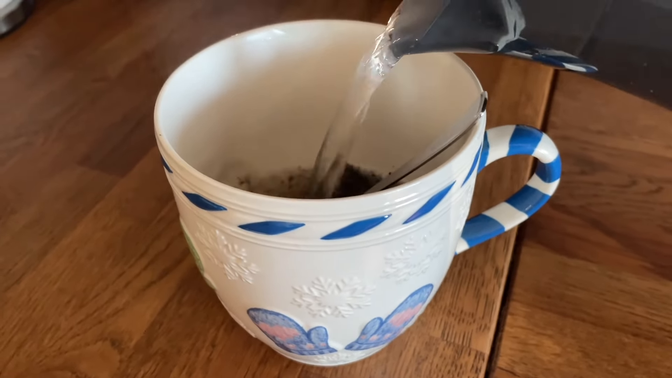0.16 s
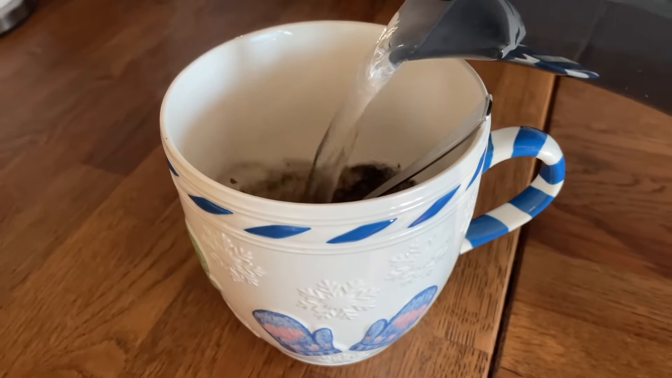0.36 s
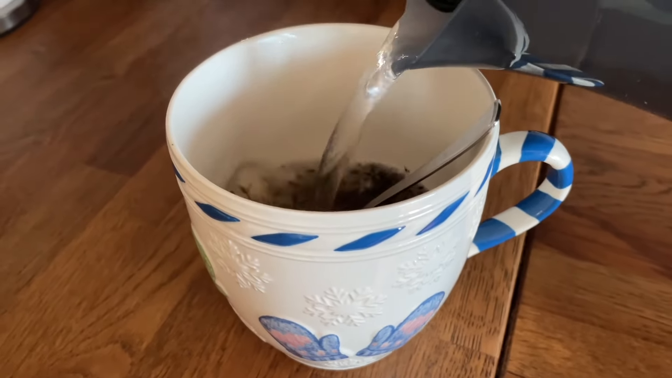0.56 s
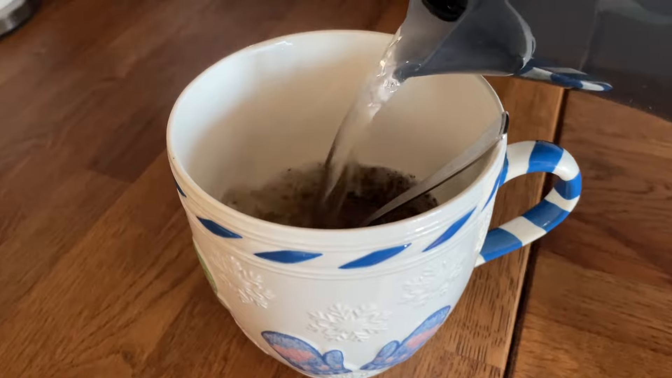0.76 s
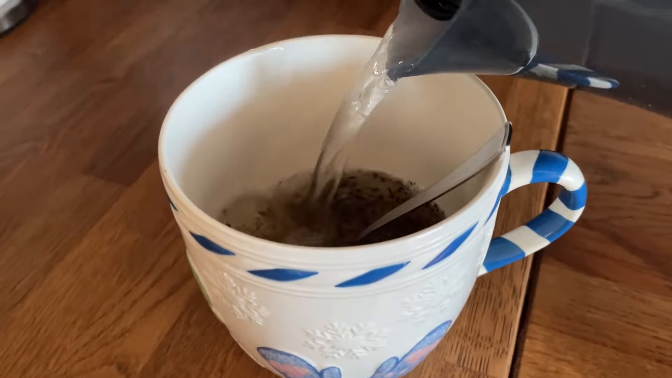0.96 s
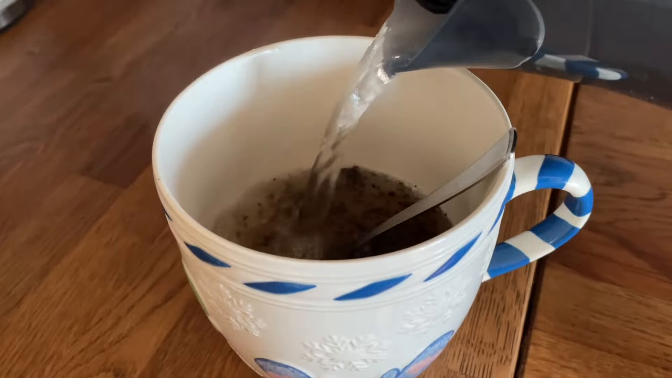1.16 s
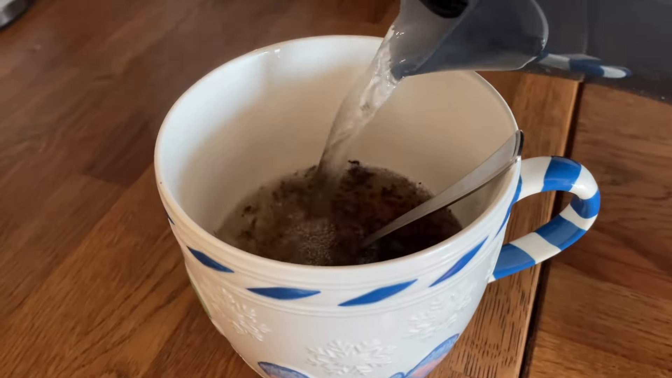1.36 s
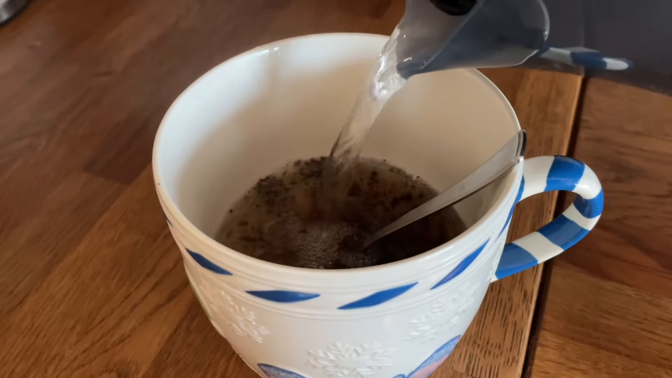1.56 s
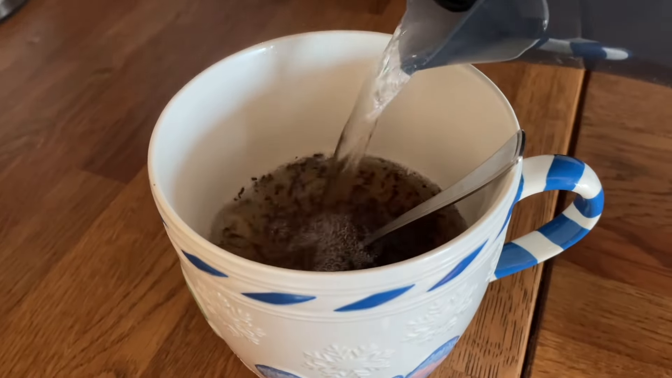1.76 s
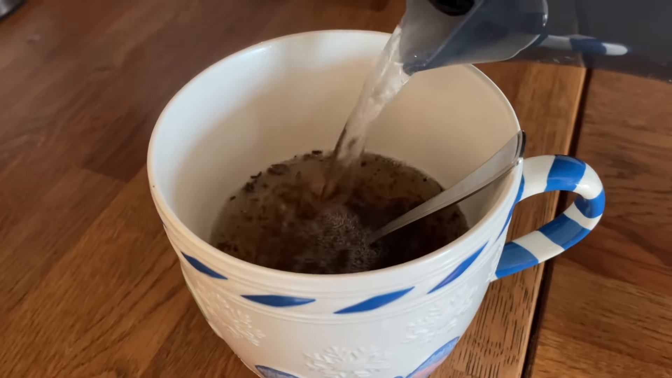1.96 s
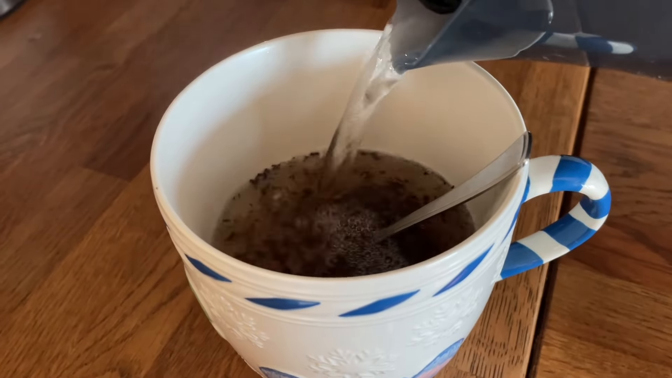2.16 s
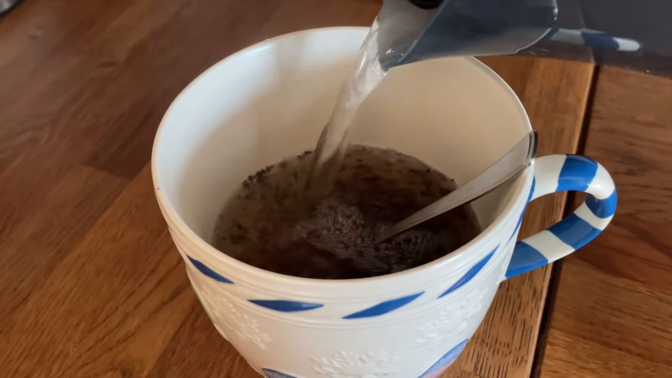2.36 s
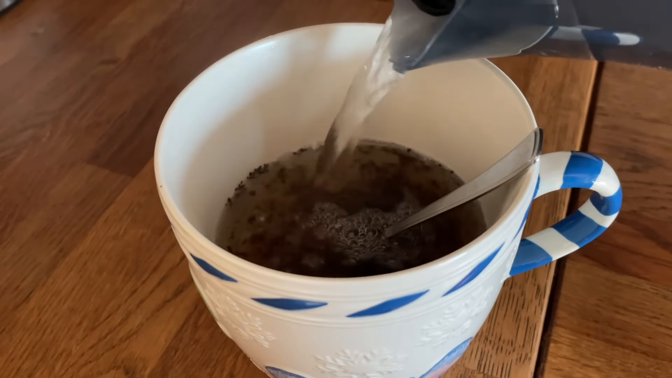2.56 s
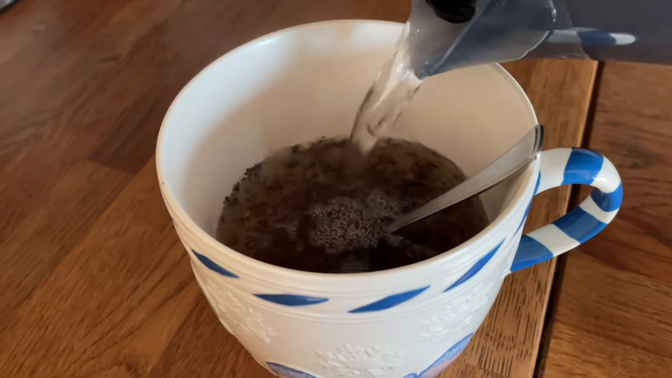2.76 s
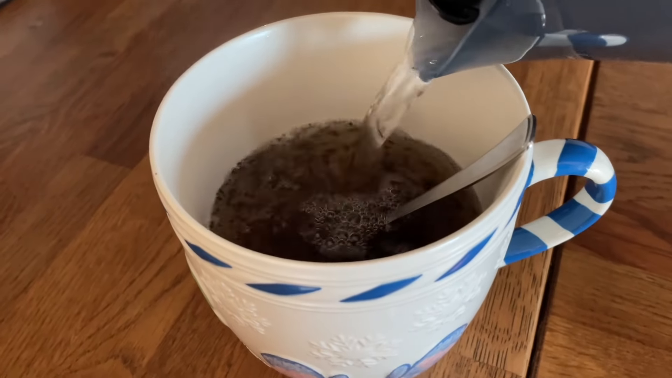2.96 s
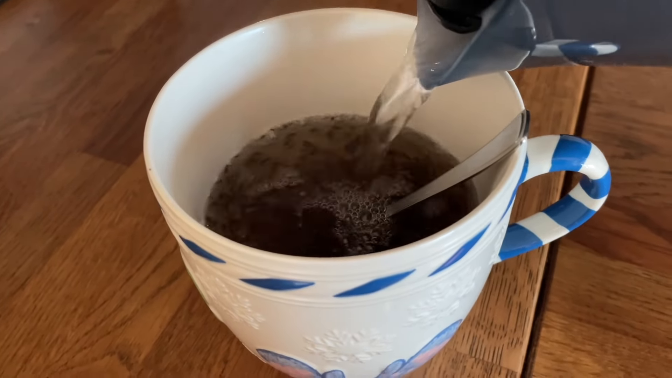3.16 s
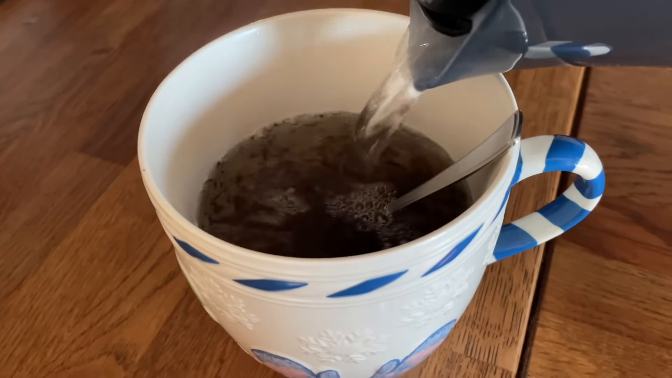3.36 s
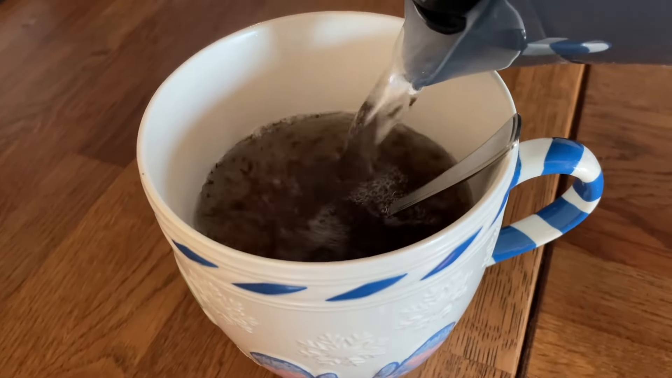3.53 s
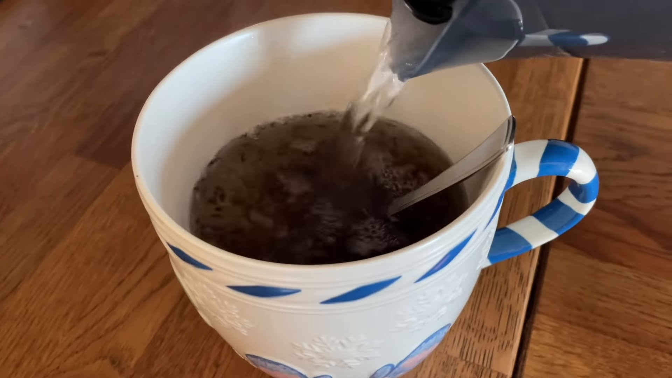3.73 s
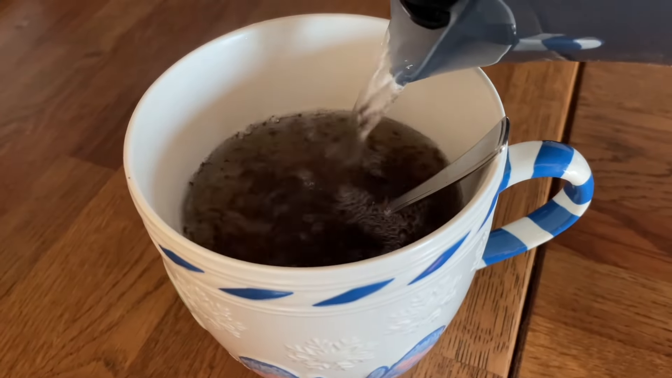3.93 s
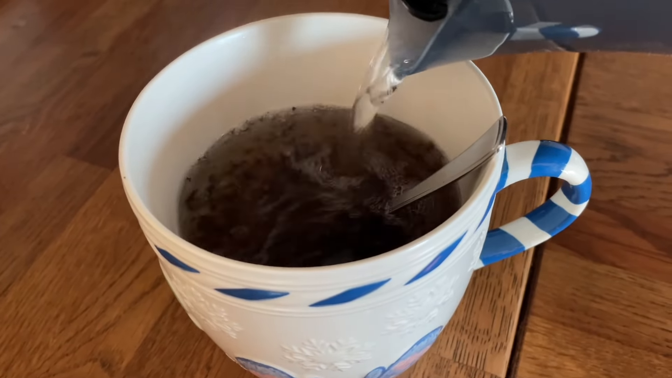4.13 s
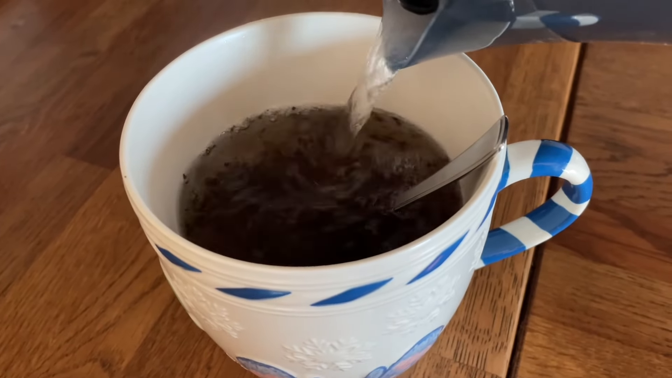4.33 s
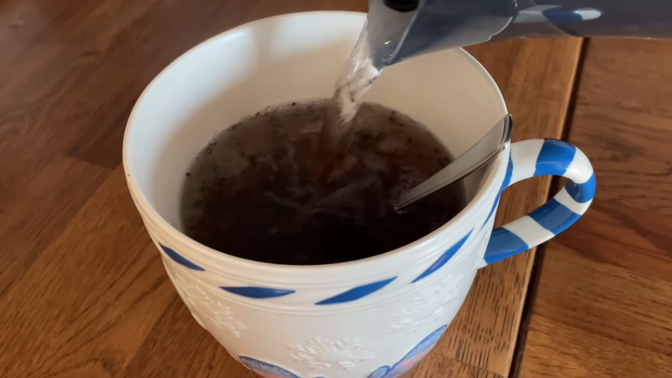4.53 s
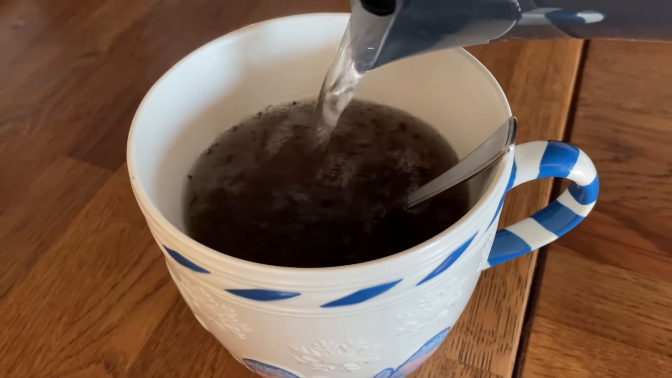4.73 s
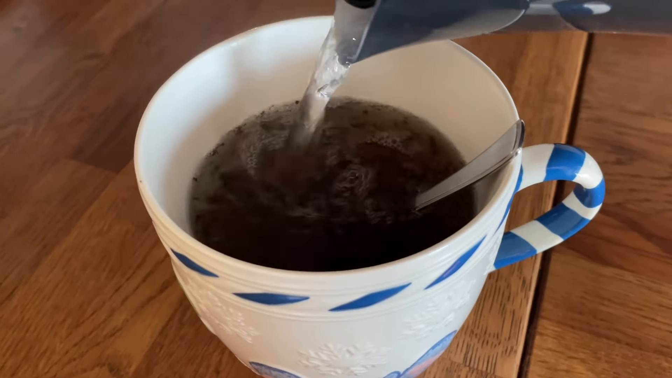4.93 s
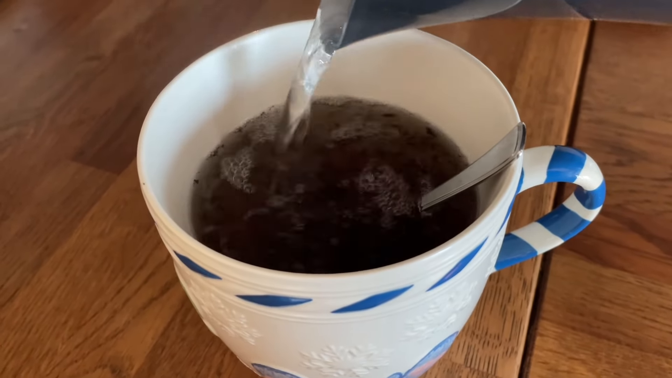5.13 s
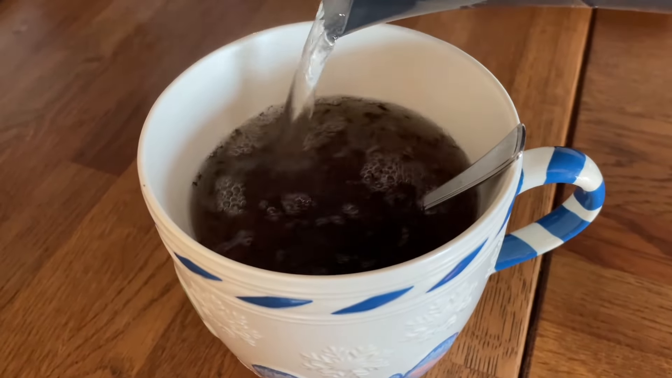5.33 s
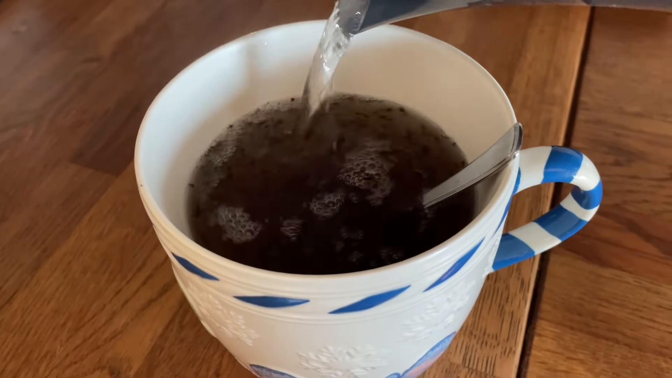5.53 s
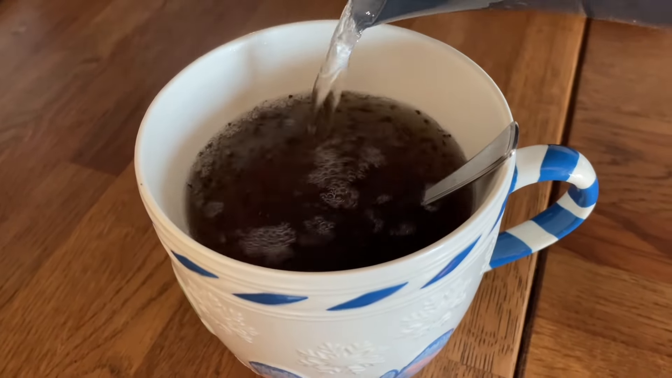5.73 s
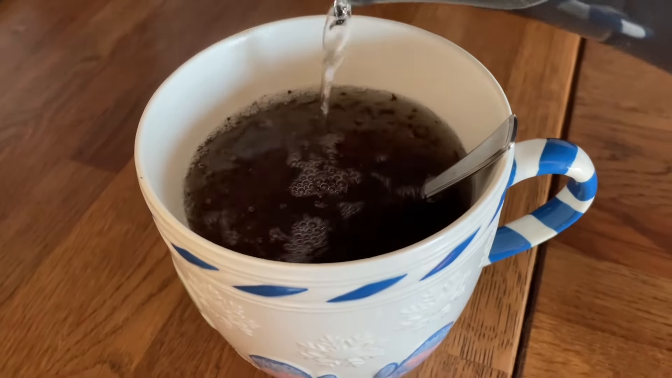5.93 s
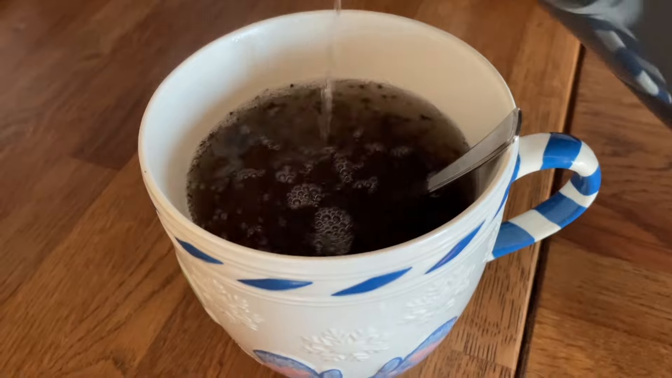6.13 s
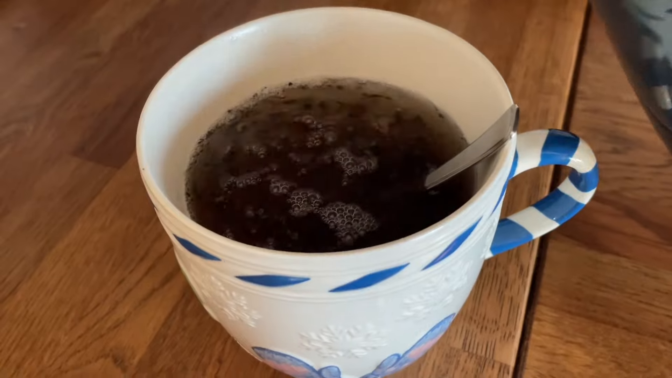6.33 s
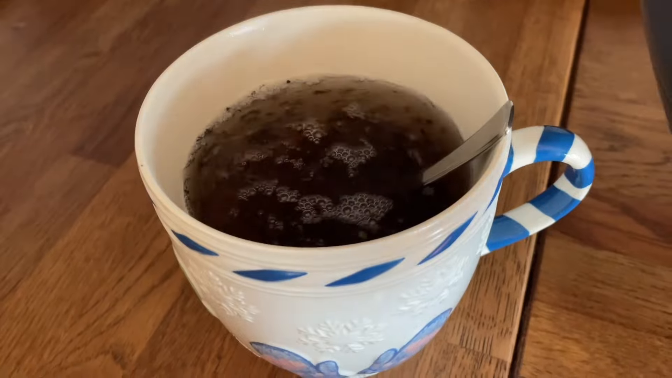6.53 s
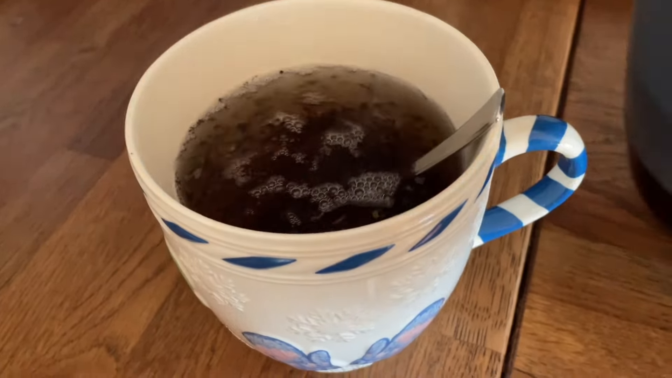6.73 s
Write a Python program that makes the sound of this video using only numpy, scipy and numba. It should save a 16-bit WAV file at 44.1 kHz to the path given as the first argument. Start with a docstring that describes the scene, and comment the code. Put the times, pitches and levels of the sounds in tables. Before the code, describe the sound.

Close-up pour of water filling a mug, ringing gurgles rising in pitch, stopping around six seconds with soft knocks, drips and a brief faint hiss.

```python
"""Hot water pours from a kettle into a ceramic mug on a wooden table, close to a phone with two microphone ports.
From the start, bubbles caught by the stream plop, tick and spit as decaying sines over a random patter.
Resonators for the air above the water ring with them, mostly higher and looser as the mug fills.
Near the end something knocks dully on wood (pushed decaying modes), the stream breaks into drops,
and a brief hiss (band noise) dies away. A quiet kitchen rumble and faint air (coloured noise) run throughout."""
import sys
import numpy as np
from scipy import signal
from scipy.fft import rfft, irfft, next_fast_len
from scipy.io import wavfile
from numba import njit

SR = 44100
rng = np.random.default_rng(int(sys.argv[2]) if len(sys.argv) > 2 else 0)


def master_out(mix):
    """Clip the mix to full scale and print it as 16-bit PCM to the path in sys.argv[1]."""
    frames = np.transpose(np.atleast_2d(mix))
    ceiling = np.clip(frames, -1, 1)
    pcm = np.round(ceiling * 32767).astype(np.int16)
    wavfile.write(sys.argv[1], SR, pcm)


N = 303840


def undb(db):
    """Amplitude ratio of a level in dB."""
    return 10 ** (np.asarray(db) / 20)


def level(x, db):
    """Scale x to an RMS level in dB."""
    return x * undb(db) / np.sqrt(np.mean(x ** 2))


def steady(value):
    """Constant control signal."""
    return np.full(N, float(value))


def over_time(table):
    """Interpolate each column over the scene."""
    t_s, *columns = np.transpose(table)
    return [np.interp(np.arange(N) / SR, t_s, column) for column in columns]


def over_pitch(table, size):
    """Interpolate a spectrum on log frequency for an FFT of this size."""
    hz, value = np.transpose(table)
    bins_hz = np.arange(size // 2 + 1) * SR / size
    return np.interp(np.log(bins_hz + 1), np.log(hz + 1), value)


def drift(rate_hz, count=1):
    """Random motion below rate_hz, RMS 1."""
    lowpass = signal.butter(2, rate_hz, fs=SR, output="sos")
    return level(signal.sosfilt(lowpass, rng.standard_normal((count, N))), 0)


@njit
def svf(x, hz, width_hz):
    """State-variable band-pass with moving centre and width, gain 1 at the centre."""
    y, band, low = np.empty(len(x)), 0., 0.
    for i in range(len(x)):
        g, damping = np.tan(np.pi * hz[i] / SR), width_hz[i] / hz[i]
        v = (band + g * (x[i] + 1e-18 - low)) / (1 + g * (g + damping))
        band, low, y[i] = 2 * v - band, low + 2 * g * v, damping * v
    return y


@njit
def grains(length, start, hz, cycles, size, glide):
    """Sines swell over half a cycle, decay by 1/e per `cycles` and slide up as the bubble nears the surface."""
    y = np.zeros(length)
    for k in range(len(start)):
        step, phase, gain = 2 * np.pi * hz[k] / SR, 0., size[k]
        fade = np.exp(-hz[k] / SR / cycles[k])
        rise_ratio = 1 + glide * hz[k] / SR / cycles[k]
        stop = min(length, start[k] + int(6 * cycles[k] * SR / hz[k]))
        for i in range(start[k], stop):
            y[i] += gain * np.sin(phase) * min(phase / np.pi, 1.)
            phase += step
            step = min(step * rise_ratio, 2.8)
            gain *= fade
    return y


def bubbles(t_s, hz, octaves, cycles, db, chance):
    """One bubble grain per time, with scattered pitch and decay and random polarity."""
    pitch_hz = np.clip(hz * 2 ** (octaves * chance[:, 0]), 200, .42 * SR)
    decay_cycles = cycles * np.exp(0.13 * chance[:, 1])
    size = undb(db) * np.sign(chance[:, 2])
    return grains(N, (t_s * SR).astype(np.int64), pitch_hz, decay_cycles, size, 0.089)


# clearest pops: t/s, plop level/dB, tick level/dB, spit level/dB; before part gain
CLEAR_POPS = [(0.033, -35.5, -39, -41), (0.053, -42, -69, -55), (0.085, -44, -65, -83),
              (0.153, -33, -39, -52), (0.179, -28.5, -38.5, -78), (0.261, -37, -42.5, -81),
              (0.287, -43, -57, -80), (0.358, -30.5, -77, -76), (0.402, -33.5, -44, -63),
              (0.419, -33, -55, -69), (0.477, -27.5, -43.5, -62), (0.486, -30, -43, -51.5),
              (0.55, -31, -40.5, -52), (0.572, -30.5, -42.5, -56), (0.598, -29, -36, -46),
              (0.607, -28.5, -63, -48), (0.655, -28.5, -64, -73), (0.724, -36.5, -69, -79),
              (0.76, -31, -43, -50), (0.786, -36, -68, -79), (0.806, -30.5, -75.5, -75),
              (0.857, -30, -31.5, -50.5), (0.888, -36, -55, -77), (0.907, -47, -48, -73),
              (0.927, -36.5, -46, -64), (0.972, -31, -64, -83), (0.997, -33.5, -49, -59),
              (1.014, -34, -58, -80), (1.073, -33.5, -69, -84), (1.103, -42, -45, -61),
              (1.248, -36, -56, -74), (1.276, -34, -45, -59), (1.297, -36.5, -42.5, -59),
              (1.35, -32.5, -72, -80), (1.388, -39.5, -69, -81), (1.427, -26, -40, -61),
              (1.46, -30.5, -40, -78), (1.477, -33.5, -42, -58), (1.629, -36.5, -63, -56.5),
              (1.926, -39, -44.5, -56), (1.97, -34, -35, -47), (1.9715, -22.5, -29, -38),
              (2.062, -40.5, -44, -66), (2.093, -54, -42, -50), (2.117, -34.5, -42, -80),
              (2.131, -65, -41.5, -78), (2.162, -54, -51, -70), (2.179, -36.5, -50, -74),
              (2.218, -44, -44, -64), (2.246, -34.5, -43, -80), (2.278, -41, -41, -77),
              (2.427, -44.5, -61, -77), (2.564, -38, -41.5, -63.5), (2.605, -26.5, -38, -49.5),
              (2.769, -36.5, -42, -74), (2.802, -38, -37, -60), (2.834, -37, -37.5, -49),
              (2.897, -55, -57, -48), (2.904, -32.5, -25, -36.5), (2.933, -32, -42, -45),
              (2.971, -40, -42, -53), (3.01, -28, -33, -52), (3.07, -27, -47, -58),
              (3.124, -36.5, -47, -49.5), (3.15, -32.5, -37, -49), (3.288, -41, -53, -57.5),
              (3.333, -37, -69, -78), (3.533, -28, -38.5, -56), (3.557, -52, -44, -58),
              (3.58, -40, -35, -41.5), (3.645, -62, -51, -74), (3.657, -57, -43, -68),
              (3.665, -35.5, -40.5, -64), (3.697, -42, -53, -63), (3.711, -36.5, -49, -59),
              (3.775, -40, -43, -48.5), (3.852, -45, -48, -49), (3.914, -40.5, -64, -60),
              (3.934, -43, -53, -71), (3.969, -37.5, -46, -57), (3.997, -57, -45, -53),
              (4.012, -60, -45.5, -74), (4.036, -50, -60, -72), (4.052, -42, -44, -60),
              (4.086, -53, -40, -71), (4.114, -49, -54, -71), (4.15, -57, -39, -62), (4.183, -45, -60, -63),
              (4.192, -41, -61, -76), (4.208, -41, -51, -71), (4.257, -44, -56, -72),
              (4.286, -44, -64, -61), (4.314, -55, -59, -57.5), (4.345, -38.5, -57, -59),
              (4.402, -63, -49, -69), (4.415, -47, -55, -79), (4.437, -34.5, -60, -77),
              (4.454, -37, -64, -84), (4.482, -35, -61, -76), (4.503, -40, -63, -64),
              (4.524, -44, -56, -64), (4.554, -54, -44.5, -52), (4.574, -45, -61, -70),
              (4.601, -42, -57, -49.5), (4.636, -34.5, -63, -65), (4.647, -33.5, -52, -62),
              (4.69, -35, -43, -57), (4.756, -34, -58, -60), (4.798, -36.5, -44, -56),
              (4.81, -31, -52, -76), (4.877, -43, -45, -49), (4.932, -37, -49, -58),
              (5.031, -46, -47.5, -57), (5.065, -37.5, -42, -60), (5.143, -47, -51, -61),
              (5.179, -58, -42.5, -70), (5.223, -41, -47, -57), (5.314, -59, -55, -66),
              (5.408, -45, -45, -74), (5.419, -27, -41, -46), (5.455, -38, -53, -76),
              (5.467, -39, -48, -64), (5.532, -42, -63, -76), (5.566, -52, -52, -74),
              (5.577, -52, -46, -60), (5.664, -40, -51, -68), (5.678, -39.5, -62, -84),
              (5.741, -65, -45, -68), (5.75, -53, -40.5, -64), (5.767, -37, -56, -66),
              (5.788, -36, -50, -80), (5.832, -25, -40, -68), (5.978, -44, -50, -59),
              (6.004, -60, -51, -62), (6.022, -62, -40, -49), (6.033, -58, -45.5, -57),
              (6.053, -48, -39, -47.5), (6.072, -28, -36, -44), (6.084, -23, -33.5, -55),
              (6.105, -48, -35, -43.5), (6.115, -47, -43, -62), (6.144, -27.5, -33, -48),
              (6.162, -25, -36.5, -56), (6.178, -44, -51, -61), (6.188, -33, -48, -56),
              (6.199, -33.5, -45, -69.5)]
# plop, tick, spit: f/Hz, decay/cycles, pitch scatter/octaves, gain/dB
POP_PARTS = [(920, 0.57, 0.29, 2.5), (3385, 0.74, 0.39, 9), (10000, 1.19, 0.52, 22)]
# each sounding of a part: nominal delay/s, gain/dB
POP_REPEATS = ((.0002, -2), (.0007, -12.5), (.0018, -7), (.0045, -14))


def pops(rows):
    """A bubble pinches off and its neck snaps within milliseconds: each part sounds four times; plops climb."""
    t_s, *parts_db = np.transpose(rows)
    out = 0
    for db, (hz, cycles, octaves, part_db), climb in zip(parts_db, POP_PARTS, (rise(t_s), 1, 1)):
        for late_s, drop_db in POP_REPEATS:
            chance = np.clip(rng.standard_normal((400, 4))[:len(t_s)], -1.5, 1.5)
            start_s = t_s + late_s * np.exp(.3 * chance[:, 3])
            out = out + bubbles(start_s, hz * climb, octaves, cycles, db + part_db + drop_db, chance)
    return out


FAINT_PER_S, POUR_ENDS_S = 24, 6.2
FAINT_DB, FAINT_SCATTER_DB = (-54, -58.5, -73.5), (7.5, 3, 8)  # plop, tick, spit


def faint_pops():
    """Random rows like CLEAR_POPS, at uneven gaps while the stream runs."""
    gap, size = rng.gamma(2, .5, 400), rng.standard_normal((400, 3))
    t_s = np.cumsum(gap) / FAINT_PER_S
    parts_db = FAINT_DB + np.clip(size, -3, 1.5) * FAINT_SCATTER_DB
    return np.column_stack([t_s, parts_db])[t_s < POUR_ENDS_S]


# patter flow: t/s, large bubbles level/dB, small bubbles level/dB, spray level/dB
PATTER_FLOW = [(0.0, -60, -60.5, -70.5), (0.9, -60.5, -69.5, -70.5), (1.4, -72.5, -64, -71.5),
               (1.7, -73, -69, -70), (2.7, -72.5, -65.5, -75), (3.5, -70.5, -65, -73.5),
               (3.95, -78, -69, -70.5), (4.3, -70.5, -67, -76.5), (4.46, -63, -65.5, -74),
               (4.6, -71, -68.5, -75), (4.9, -73, -76, -74), (5.7, -73, -67.5, -79), (6.0, -67, -77.5, -64),
               (6.25, -90, -88, -86), (6.88, -95, -95, -90)]
# bubble families: rate/(1/s), f/Hz, pitch scatter/octaves, decay/cycles, size scatter/dB, level/dB before flow
LARGE_BUBBLES = (420, 828, 0.36, 2, 8, -4)
SMALL_BUBBLES = (600, 3197.5, 0.64, 1.5, 1, -1.5)
SPRAY_BUBBLES = (2700, 8600, 0.084, 0.3, 5.3, 0.85)
# stream drumming on the mug bottom, same columns; negative size scatter: most loud, a few fainter
BOTTOM_DRUMMING = (150, 222, -0.54, 1, -7.5, -2)
LARGEST_DB = 5.5  # size cap above the family's base size


def patter(family, flow_db, surge, climbs=False):
    """Bubbles at random times with exponential size scatter in dB, swelling with the stream's surges."""
    rate_per_s, hz, octaves, cycles, scatter_db, db = family
    chance = rng.random((16000, 2))
    t_s = np.cumsum(-np.log(1 - chance[:, 0])) / rate_per_s
    heard = t_s < PATTER_FLOW[-1][0]
    size_db = np.minimum(-scatter_db * np.log(1 - chance[heard, 1]), LARGEST_DB)
    pitch_hz = hz * rise(t_s[heard]) if climbs else hz
    sound = bubbles(t_s[heard], pitch_hz, octaves, cycles, size_db, rng.standard_normal((16000, 3))[heard])
    return level(sound * surge, db) * undb(flow_db)


def surges(rate_hz, spread_db):
    """The stream wobbles: sudden random swells sink back exponentially."""
    kicks = (rng.random(N) < rate_hz / SR) * rng.exponential(size=N)
    swell = signal.lfilter([1], [1, -np.exp(-1.5 * rate_hz / SR)], kicks)
    return undb(spread_db * np.minimum(swell, 2.5))


# stream runs smooth, few bubbles form: t/s, half length/s, level/dB
SMOOTH_LULLS = [(1.17, 0.044, -1), (2.54, 0.044, -9.5), (3.432, 0.096, -4), (3.737, 0.032, -7),
                (3.87, 0.057, -5), (5.65, 0.015, -11)]


def lulls():
    """Gain of the random bubbling, dipping in each lull."""
    t = np.arange(N) / SR
    return undb(sum(db * np.exp(-((t - t_s) / half_s) ** 4) for t_s, half_s, db in SMOOTH_LULLS))


# air above the water: t/s, depth mode f/Hz, cross mode f/Hz, widening/ratio, depth ring level/dB,
# cross ring level/dB, middle mode f/Hz, middle ring level/dB
AIR_COLUMN = [(0, 896, 2300, 0.69, 10.5, -15.5, 1480, 6), (1.1, 940, 2273, 0.85, 11, 5, 1563, 4.5),
              (1.6, 943, 2286, 1.17, 15, 0, 1510, 2), (2.3, 1036, 2360, 1.4, 13, -2, 1540, -1),
              (2.9, 1055, 2420, 3.8, 7.5, -7, 1540, -2.5), (3.7, 1150, 2450, 4.24, 6.5, -9.5, 1590, -2),
              (4.5, 1190, 2550, 4.4, -2.5, -6, 1600, -7.5), (5.4, 1290, 2480, 4, -5, -5.5, 1640, -8),
              (6.2, 1160, 2670, 2.1, -3.5, -6.5, 1660, 0)]
# f/depth mode, width/Hz at widening 1, gain/dB, loss/dB per unit widening above 1
DEPTH_RESONANCES = [(1.0, 87, -2.5, -0.5), (.76, 850, -11, 10.5)]
# f/cross mode, width/Hz at widening 1, gain/dB
CROSS_RESONANCES = [(0.998, 86, 12), (1.35, 282, 0.5)]
# four resonances of the mug wall, then a thin high band near 15 kHz: f/Hz, width/Hz, gain/dB
FIXED_RESONANCES = [(3700, 20, 0.5), (4550, 140, -3), (6160, 110, 4), (6970, 2600, -1), (15100, 370, 12.5)]
# rim echo cancels: f/cross mode, width/Hz, share removed per unit widening
RIM_DIPS = [(.8, 200, .1), (1.38, 350, .18)]
MIDDLE_WIDTH_HZ = 68  # at widening 1
SLOSH_HZ, SLOSH_SHARE = 6.4, 0.017  # rocking surface detunes the modes
# low ring of the nearly empty mug
EARLY_HZ, EARLY_WIDTH_HZ, EARLY_START_DB, EARLY_LOSS_DB_PER_S = 772, 60, 9, 5


def mug(water):
    """Direct sound plus band-pass resonances: moving air modes along and across the mug, and fixed ones."""
    depth_hz, cross_hz, wide, depth_db, cross_db, middle_hz, middle_db = over_time(AIR_COLUMN)
    rocking = drift(SLOSH_HZ, count=2)
    depth_hz = depth_hz * (1 + SLOSH_SHARE * rocking[0])
    cross_hz = cross_hz * (1 + SLOSH_SHARE * rocking[1] / 2)
    middle_hz = middle_hz * (1 + SLOSH_SHARE * rocking[1])

    depth = 0
    for ratio, width_hz, db, lost_db in DEPTH_RESONANCES:
        gain = undb(db - lost_db * (wide - 1) + depth_db)
        depth = depth + gain * svf(water, ratio * depth_hz, width_hz * wide)
    cross = 0
    for ratio, width_hz, db in CROSS_RESONANCES:
        cross = cross + undb(db + cross_db) * svf(water, ratio * cross_hz, width_hz * wide)
    fixed = sum(undb(db) * svf(water, steady(hz), steady(width_hz)) for hz, width_hz, db in FIXED_RESONANCES)
    middle = undb(middle_db) * svf(water, middle_hz, MIDDLE_WIDTH_HZ * wide)
    early_db = EARLY_START_DB - EARLY_LOSS_DB_PER_S * np.arange(N) / SR
    early = undb(early_db) * svf(water, steady(EARLY_HZ), steady(EARLY_WIDTH_HZ))

    # small bubbles radiate little below the depth mode
    direct = water - svf(water, 0.087 * depth_hz, 0.14 * depth_hz)
    direct = direct - svf(direct, 0.64 * depth_hz, 0.57 * depth_hz)
    out = undb(-5.0) * direct + depth + cross + middle + early + fixed
    for ratio, width_hz, share in RIM_DIPS:
        out = out - np.clip(share * wide, 0, .9) * svf(out, ratio * cross_hz, steady(width_hz))
    return out


def rise(t_s):
    """Depth mode frequency at these times relative to its start."""
    table_s, depth_hz = np.transpose(AIR_COLUMN)[:2]
    return np.interp(t_s, table_s, depth_hz) / depth_hz[0]


# lone clear-pitched bubbles: t/s, f/Hz, decay/cycles, level/dB
LONE_BUBBLES = [(5.488, 805, 30, -58), (6.254, 2700, 9, -68), (6.265, 3250, 11, -68),
                (6.276, 3830, 11, -61.5), (6.334, 6650, 11, -59.5)]


def blips():
    """Single bubbles ring on near the surface as long sine grains with little glide."""
    t_s, hz, cycles, db = np.transpose(LONE_BUBBLES)
    return grains(N, (t_s * SR).astype(np.int64), hz, cycles, undb(db), 0.015)


# f/Hz, left minus right level/dB
PORT_BALANCE = [(60, -11.5), (200, -9), (380, 16), (700, 5), (1290, 4.5), (2380, 7), (4400, 7),
                (8120, -1.5), (15000, 0)]
# f/Hz, left lead/rad
PORT_PHASE = [(0, 0), (690, .6), (1460, .45), (2500, 1.45), (4130, .9), (5250, .3), (6460, -1.0),
              (8200, -3.1), (9400, -4.2), (10600, -5.7), (12000, -6.3), (13500, -7.6), (15200, -9.4),
              (16700, -10.3)]
WANDER_HZ, WANDER_DB = 24.8, 2.5  # left minus right


def ports(x):
    """Two ports hear the mug at different level and phase; the foot of the stream wanders between them."""
    size = next_fast_len(N + 2048)
    sway = undb(WANDER_DB * drift(WANDER_HZ) * np.array([[.5], [-.5]]))
    half = undb(over_pitch(PORT_BALANCE, size) / 2) * np.exp(.5j * over_pitch(PORT_PHASE, size))
    return irfft(rfft(x, size) * np.array([half, 1 / half]), size)[:, :N] * sway


# dull knocks: t/s, level/dB, contact/ms, left minus right level/dB
WOOD_KNOCKS = [(5.834, -40, 0.42, -8), (5.839, -28.5, 1.57, -1), (5.848, -35.5, 0.42, 2),
               (6.086, -37, 0.2, 4), (6.092, -26.5, 0.88, 0.5), (6.107, -38, 1.4, -1),
               (6.443, -52.5, 0.49, -4)]
# f/Hz, gain/dB, t60/s; f and gain scatter per knock
WOOD_RESONANCES = [(111, -12, 0.07), (210, -11, 0.01), (328, 2.5, 0.056), (480, -4.5, 0.016),
                   (890, 0, 0.018), (1172, -8, 0.052), (1580, -9, 0.046), (2240, -10.5, 0.037)]
CRACK_DB, CRACK_HZ, CRACK_T60_S = -7, 1500, 0.071  # broad noise of a knock


def knocks():
    """Half-sine pushes into the modes of the wood; a softer contact pushes longer and sounds duller."""
    t = np.arange(SR // 4) / SR
    out = np.zeros((2, N + len(t)))
    for t_s, db, contact_ms, pan_db in WOOD_KNOCKS:
        chance = rng.standard_normal((len(WOOD_RESONANCES), 2))
        ring = 0
        for (hz, mode_db, t60_s), (db_chance, hz_chance) in zip(WOOD_RESONANCES, chance):
            tone = np.sin(2 * np.pi * hz * (1 + .008 * hz_chance) * t)
            ring = ring + undb(mode_db + 1.5 * db_chance) * tone * 1000 ** (-t / t60_s)
        crack_hz = np.full(len(t), float(CRACK_HZ))
        crack = level(svf(rng.standard_normal(len(t)), crack_hz, crack_hz), CRACK_DB)
        ring = ring + crack * undb(-60 * t / CRACK_T60_S)
        push = np.sin(np.pi * np.clip(t[:400] * 1000 / contact_ms, 0, 1))
        blow = np.convolve(ring, push / push.sum())[:len(t)]
        start = int(t_s * SR)
        out[:, start:start + len(t)] += blow * undb(db + np.array([[pan_db], [-pan_db]]) / 2)
    return out[:, :N]


HISS_S, HISS_DB, HISS_T60_S = 6.721, -65, .28  # dB before flicker and decay
HISS_HZ, HISS_WIDTH_HZ = 4300, 2400


def hiss():
    """Sudden soft, sputtering hiss: band noise, independent left and right, flickers and decays."""
    t = np.arange(N) / SR - HISS_S
    noise = [svf(rng.standard_normal(N), steady(HISS_HZ), steady(HISS_WIDTH_HZ)) for _ in range(2)]
    envelope = undb(3 * drift(70) - 60 * np.abs(t) / HISS_T60_S)
    return level(np.array(noise), HISS_DB) * (t > 0) * envelope


ROOM_T60_S, ROOM_DB, ROOM_TOP_HZ = 0.08, -16, 3900  # dB: tail energy


def room(x):
    """Short dull tail from table and walls: decaying noise, unrelated left and right."""
    t = np.arange(SR // 2) / SR
    tail = rng.standard_normal((2, len(t))) * 1000. ** (-t / ROOM_T60_S) * (t > .003)
    tail = signal.lfilter(*signal.butter(1, ROOM_TOP_HZ, fs=SR), tail)
    tail = undb(ROOM_DB) * tail / np.sqrt(np.sum(tail[0] ** 2))
    return signal.fftconvolve(x, tail, axes=1)[:, :N]


# kitchen rumble: f/Hz, relative density/(dB per Hz)
RUMBLE_COLOUR = [(20, -57), (33, -31), (44, -4.5), (56, 2), (70, -10.5), (82, -9), (93, 4), (105, -14.5),
                 (114, -8), (145, -23), (215, -12), (260, -12.5), (292, -22), (330, -15), (375, -20.5),
                 (402, -22), (437, -26), (490, -16), (600, -29), (800, -72)]
# faint air: f/Hz, relative density/(dB per Hz)
AIR_COLOUR = [(260, -24), (450, -9), (640, -7.5), (820, -10), (1060, -22.5), (2500, -36), (6000, -38.5),
              (8300, -42.5), (11000, -31.5), (14000, -47), (16500, -71.5)]
# f/Hz, likeness of left and right (0 to 1)
LIKENESS = [(40, 0.98), (80, 0.99), (130, 0.75), (290, 0.8), (640, 0.022), (1400, 0.032), (15000, 0.017)]
# f/Hz, left minus right level/dB
BACKGROUND_BALANCE = [(40, -2.5), (80, -0.5), (200, -3), (700, -2), (2400, 2), (8000, 1)]
RUMBLE_DB, AIR_DB = -50.5, -67.5


def background(colour, db):
    """Steady coloured noise, alike left and right in the bass only, mixed from mid and side."""
    size = next_fast_len(N)
    alike = np.clip(over_pitch(LIKENESS, size), 0, 1)
    noise = rfft(rng.standard_normal((2, size))) * undb(over_pitch(colour, size))
    mid, side = noise * np.sqrt([1 + alike, 1 - alike])
    half = undb(over_pitch(BACKGROUND_BALANCE, size) / 2)
    return level(irfft(np.array([(mid + side) * half, (mid - side) / half]), size)[:, :N], db)


def scene():
    """Pour through mug and ports, knocks, their room tail, hiss and background."""
    large_db, small_db, spray_db = over_time(PATTER_FLOW)
    surge = surges(60., 3.5)
    water = pops(faint_pops())
    water = water + patter(LARGE_BUBBLES, large_db, surge, climbs=True)
    water = water + patter(SMALL_BUBBLES, small_db, surge)
    water = water + patter(SPRAY_BUBBLES, spray_db, surge ** 1.6)
    in_mug = mug(pops(CLEAR_POPS) + lulls() * water)
    drumming = patter(BOTTOM_DRUMMING, large_db, surge)
    near = ports(in_mug + drumming + blips()) + knocks()
    kitchen = background(RUMBLE_COLOUR, RUMBLE_DB) + background(AIR_COLOUR, AIR_DB)
    return near + room(near) + hiss() + kitchen


LOW_HZ, TOP_HZ = 38.6, 16500


def record(dry):
    """The phone drops the deepest bass and cuts the top."""
    thin = signal.sosfilt(signal.butter(3, LOW_HZ, "high", fs=SR, output="sos"), dry)
    return signal.sosfilt(signal.ellip(8, .2, 70, TOP_HZ, fs=SR, output="sos"), thin)


dry = scene()
out = record(dry)
master_out(out)
```